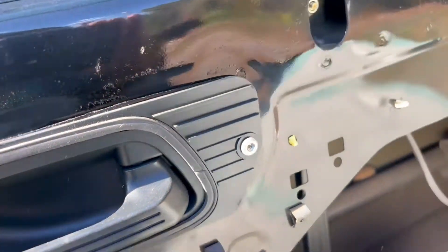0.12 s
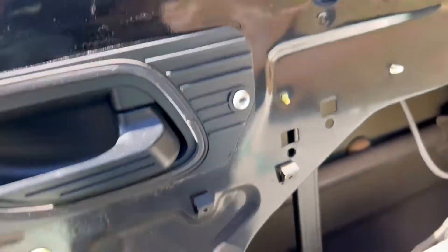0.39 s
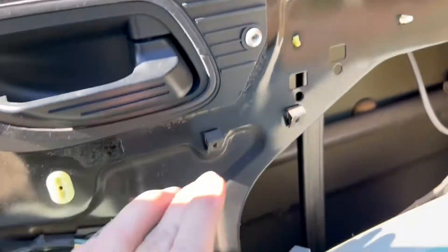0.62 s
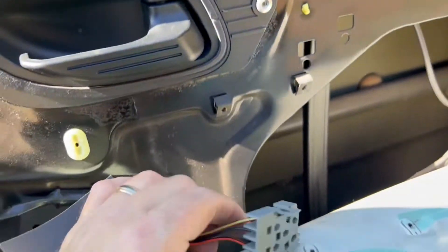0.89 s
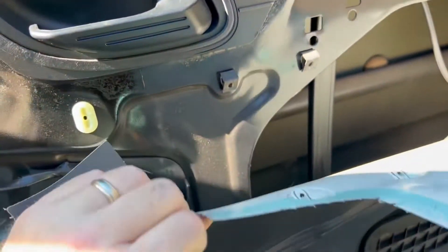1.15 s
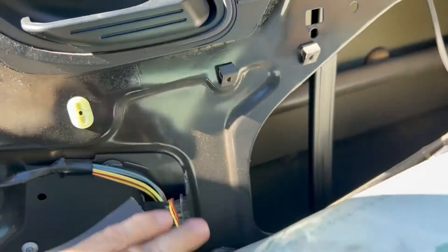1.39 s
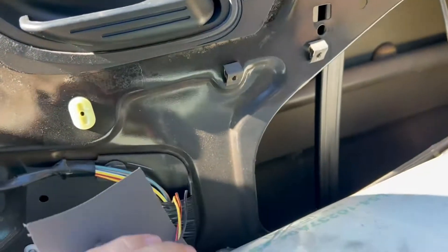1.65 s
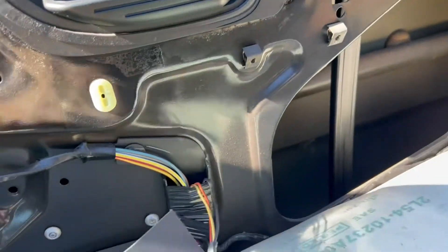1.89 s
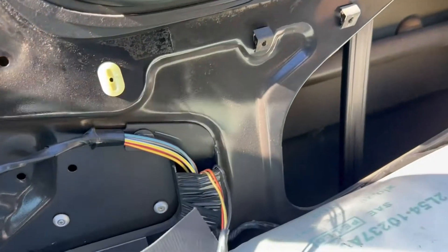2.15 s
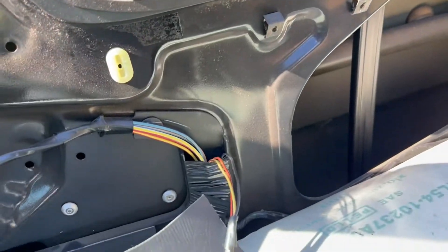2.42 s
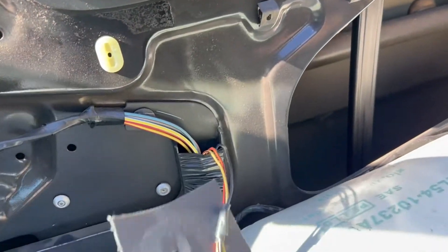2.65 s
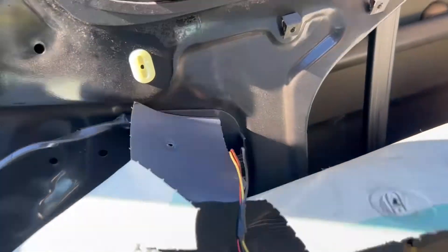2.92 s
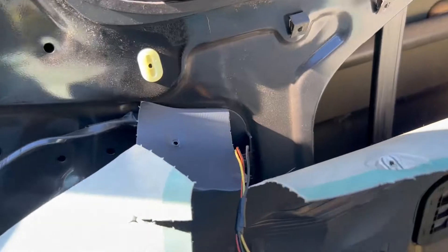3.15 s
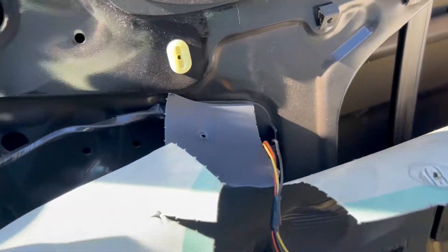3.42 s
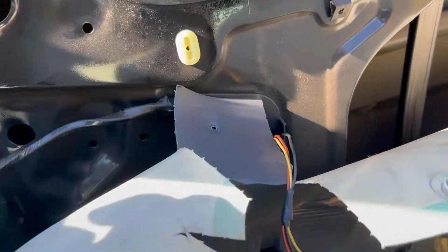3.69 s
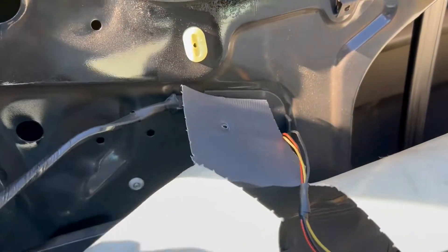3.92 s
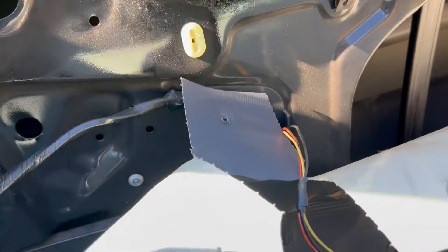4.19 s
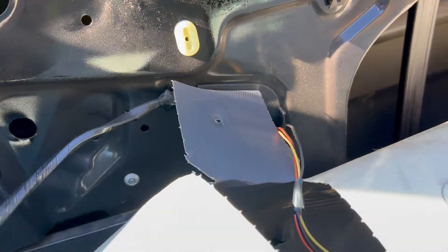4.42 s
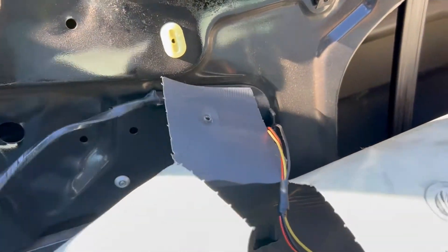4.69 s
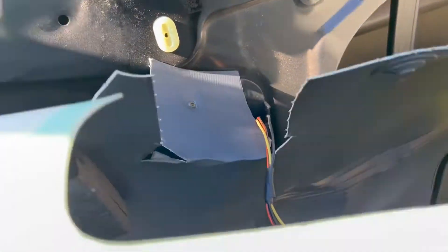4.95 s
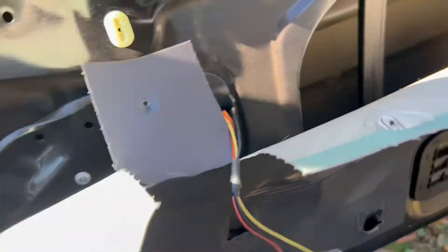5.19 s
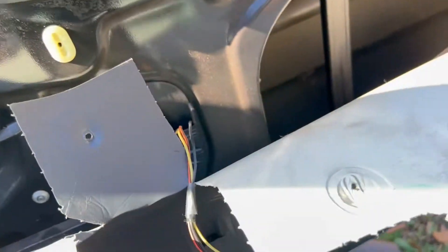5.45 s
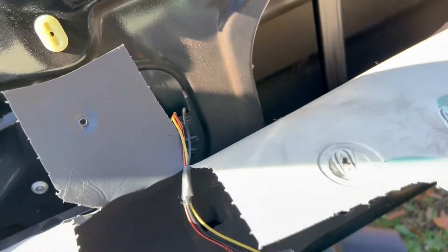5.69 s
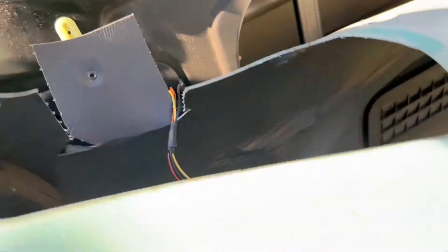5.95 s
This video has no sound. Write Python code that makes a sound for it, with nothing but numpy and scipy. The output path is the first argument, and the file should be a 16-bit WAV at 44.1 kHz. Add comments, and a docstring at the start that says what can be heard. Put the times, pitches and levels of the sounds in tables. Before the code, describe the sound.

A stiff plastic sheet rustles and crinkles against a metal car door panel, with sharp snaps and hollow knocks over a low rumble.

```python
"""At the inner panel of a car door, a stiff plastic sheet is bent, slid and pressed against the metal.
Sliding strokes rustle (banded micro-slips) and crinkle (random slips ringing the sheet's modes); the edge scrapes
(gliding noise bands), creases snap (slip bursts into the modes), bulges pop (short sagging sines).
Knocks make the panel boom (decaying modes). Beneath lie a low rumble (banded noise), a faint motor hum (wavering
sine) and hiss. Two closely spaced microphones, near the hands."""
import sys
import numpy as np
from scipy import signal
from scipy.io import wavfile

SR = 44100
rng = np.random.default_rng(int(sys.argv[2]) if len(sys.argv) > 2 else 0)


def boost(x):
    """Linear amplitude factor 10**(x/20) for a level x in decibels (scalar or array-like)."""
    u = np.asarray(x, float) / 20
    return 10 ** u


def digitize_waveform(pressure):
    """Quantize a signal to 16-bit integers and store it at the path in sys.argv[1].

    Rows of a 2-D input are taken as channels; values are limited to [-1, 1].
    """
    field = np.atleast_2d(pressure).T
    bounded = np.clip(field, -1, 1)
    quanta = np.round(bounded * 32767).astype(np.int16)
    wavfile.write(sys.argv[1], SR, quanta)


N = 268260


def rms_one(x):
    """Scale to unit rms."""
    return x / np.sqrt(np.mean(x ** 2) + 1e-20)


def in_time(rows):
    """Columns of a breakpoint table, one value per sample."""
    s, *columns = np.transpose(rows)
    return [np.interp(np.arange(N) / SR, s, c) for c in columns]


def at_hz(points, hz):
    """Read a spectrum on a log-frequency axis."""
    point_hz, values = np.transpose(points)
    return np.interp(np.log(hz), np.log(point_hz), values)


def drift(rate_hz):
    """Slow random wander of spread 1: noise through a double pole, run at SR / 40."""
    r = np.exp(-2 * np.pi * rate_hz * 40 / SR)
    noise = rng.standard_normal(N // 40 + 2002)
    slow = rms_one(signal.lfilter([1], [1, -2 * r, r * r], noise)[2000:])   # start-up dropped
    return np.interp(np.arange(N) / 40, np.arange(len(slow)), slow)


def lowpass(x, hz):
    """Second-order low-pass."""
    return signal.sosfilt(signal.butter(2, hz, fs=SR, output="sos"), x)


def ring(drive, hz, t60_s):
    """Two-pole resonator: a unit click sets a sine of height 1 ringing."""
    r, w = boost(-60 / (t60_s * SR)), 2 * np.pi * hz / SR
    return signal.lfilter([0, np.sin(w)], [1, -2 * r * np.cos(w), r * r], drive + 1e-18)


def grains(shape, per_s, spread_db):
    """Random micro-slips of uneven size and sign; rms 1."""
    sizes = boost(spread_db * np.minimum(rng.exponential(1, shape), 5))
    signs = rng.choice([-1, 1], shape)
    return rms_one(sizes * signs * (rng.random(shape) < per_s / SR))


# left-right likeness: (frequency [Hz], correlation)
LIKENESS = [(60, 0.98), (240, 0.95), (950, 0.053), (3770, 0.25), (15000, 0.45)]


def banded(source, spectrum, edges_hz, treble_db, patchy_db):
    """Stereo bands, each with its own level, flicker and likeness; the treble moves on its own."""
    out, together = 0, drift(25.0)
    for k, (low, high) in enumerate(zip(edges_hz, edges_hz[1:])):
        band = signal.butter(2, [low, high], "band", fs=SR, output="sos")
        mid, side = signal.sosfilt(band, source[k % 2])
        hz = np.sqrt(low * high)
        alike = np.clip(at_hz(LIKENESS, hz), -1, 1)
        treble_share = np.clip(np.log2(hz / 1600) / 0.5, 0, 1)
        flicker_db = patchy_db * (0.5 * together + drift(11.0))
        gain = boost(at_hz(spectrum, hz) + treble_share * treble_db + flicker_db)
        out = out + gain * (np.sqrt(1 + alike) * mid + np.sqrt(1 - alike) * side * [[1], [-1]])
    return out


def hiss():
    """Steady white noise, independent in the two channels."""
    return boost(-79.5) * rng.standard_normal((2, N))


HUM_ON_S, HUM_OFF_S, HUM_RISE_S = 0.55, 2.45, 0.87
HUM_HZ, HUM_DB, HUM_FADE_DB_PER_S = 91.8, -50, 1
WAVER_DB, WAVER_HZ = 2.5, 4.0   # spread of level and pitch


def hum():
    """A faint motor tone: a sine that wavers in pitch and level and slowly fades."""
    end_db = HUM_DB - HUM_FADE_DB_PER_S * (HUM_OFF_S - HUM_ON_S)
    level_db, = in_time([(HUM_ON_S - HUM_RISE_S, -70), (HUM_ON_S, HUM_DB),
                         (HUM_OFF_S, end_db), (HUM_OFF_S + 0.21, -90)])
    gain = np.sqrt(2) * boost(level_db + WAVER_DB * drift(5.0))
    hz = HUM_HZ + WAVER_HZ * drift(14.0)
    return gain * np.sin(2 * np.pi * np.cumsum(hz) / SR)


# strokes of the sliding sheet: (start [s], hold [s], relative rustle level [dB], treble over rustle [dB])
STROKES = [(0.0, 0.49, -50, -8), (0.087, 0.086, -42, -17.5), (0.538, 0.42, -59.5, -4),
           (0.874, 0.051, -50.5, -7), (0.968, 0.38, -53.5, -7.5), (1.142, 0.12, -46, -8),
           (1.267, 0.079, -48.5, -16), (1.396, .18, -53, -10.5), (1.652, 0.084, -51, -3),
           (1.79, 0.015, -53.5, -11), (1.889, 0.069, -55, -10.5), (2.196, 0.045, -82.5, 10),
           (2.454, 0.057, -50, -17), (2.536, 0.27, -43.5, -11.5), (2.836, 0.21, -53, -6),
           (3.082, 0.21, -52, -5), (3.362, 0.13, -51.5, -7.5), (3.523, 0.044, -51, -12.5),
           (3.64, 0.089, -40.5, -10.5), (3.757, 0.1, -50.5, -16), (3.982, 0.067, -51, -12),
           (4.09, 0.11, -49.5, -15.5), (4.205, 0.13, -55, -16), (4.453, 0.016, -51, -11.5),
           (4.529, 0.078, -53.5, -14.5), (4.65, 0.12, -51.5, -7.5), (4.804, 0.024, -44.5, -7.5),
           (4.882, 0.14, -49.5, -7.5), (5.148, 0.027, -69.5, -11), (5.309, 0.019, -75, 6.5),
           (5.647, 0.088, -52, -7.5), (5.748, 0.074, -53.5, -3.5), (5.848, 0.17, -51.5, -4),
           (6.013, 0.21, -50, 0.5)]
RISE_DB_PER_S, FALL_DB_PER_S = 451, 322.5
REST_DB, REST_TREBLE_DB = -74.5, -93.5   # sheet barely moving


def handling():
    """Strokes rise, hold and fall, overlaps adding in power; gives relative rustle and treble levels in dB."""
    t, power = np.arange(N) / SR, boost([[REST_DB], [REST_TREBLE_DB]]) ** 2
    for s, hold_s, level_db, treble_db in STROKES:
        away_db = RISE_DB_PER_S * np.maximum(s - t, 0) + FALL_DB_PER_S * np.maximum(t - s - hold_s, 0)
        power = power + boost(level_db - np.minimum(away_db, 99) + np.array([[0], [treble_db]])) ** 2
    return 10 * np.log10(power)


RUMBLE_DB, RUMBLE_FOLLOWS, SETTLE_S = -48.5, 0.43, 0.031   # usual level; share of rustle's swing; lag


def shaking(level_db):
    """The panel's shaking follows the handling level through a one-pole lag."""
    r = np.exp(-1 / (SETTLE_S * SR))
    swing_db = level_db - np.median(level_db)
    return RUMBLE_DB + RUMBLE_FOLLOWS * signal.lfilter([1 - r], [1, -r], swing_db)


# bass noise spectrum: (frequency [Hz], relative level per Hz [dB])
RUMBLE = [(25, -24.5), (43, 2), (81, 3.5), (99, -4), (118, -8.5), (162, -3), (263, -14), (400, -20)]
QUIET_TILT = 1   # extra dB above 130 Hz per dB of shaking


def rumble(level_db):
    """Door panel and hands shake in the bass; at rest the part above 130 Hz sinks further than the deep part."""
    noise, edges_hz = rng.standard_normal((2, 2, N)), 25 * 2 ** np.arange(0, 4.1, .5)
    sound = rms_one(banded(noise, RUMBLE, edges_hz, 0, patchy_db=.8))
    deep = lowpass(sound, 130)
    upper = signal.sosfilt(signal.butter(2, 130, "high", fs=SR, output="sos"), sound)
    tilt = boost(QUIET_TILT * (level_db - RUMBLE_DB))
    return boost(level_db) * (deep - upper * tilt)   # minus: the two halves are in antiphase at 130 Hz


# knocks on the door panel: (time [s], relative level [dB], boom [Hz], t60 [s])
KNOCKS = [(0.062, -34, 80, 0.17), (0.188, -29.5, 102, 0.33), (0.364, -14, 211, 0.22),
          (0.383, -12, 84.4, 0.23), (0.878, -32.5, 93, 0.29), (1.177, -8.5, 152.4, 0.28),
          (1.199, -11.5, 94.4, 0.3), (1.714, -32, 57.6, 0.28), (2.655, -20.5, 93, 0.21),
          (2.78, -11, 145, 0.15), (2.827, -21, 154.2, 0.64), (3.492, -24, 62, 0.15),
          (3.7053, -13, 187.4, 0.25), (3.818, -22.5, 123, 0.31), (3.886, -24, 130, 0.09),
          (4.032, -21.5, 150, 0.16), (4.433, -20, 170, 0.89), (4.442, -13, 72, 0.21),
          (4.831, -24.5, 205, 0.19), (5.174, -24, 67.7, 0.47), (4.772, -17.5, 74.6, 0.32),
          (4.901, -23.5, 189, 0.13), (4.938, -19, 180.6, 0.17), (4.978, -21, 215.3, 0.2),
          (5.14, -20, 64.9, 0.44), (5.669, -27, 88, 0.23)]
# panel modes: (multiple of the boom, level [dB], share of t60)
PANEL = [(1.0, 3.5, 0.55), (.52, -18, 1.9), (.74, -5, 1.1), (1.27, -5.5, 0.91), (1.599, -6.5, 0.58),
         (2.3, -13.5, 0.48), (3.1, -12.5, 0.19)]
PUSH_CYCLES = 0.32   # rise time constant, cycles of the boom
KNOCK_SIDE_DB = -16.5   # unequal reach of each mode to the two microphones
RATTLE_DB = 2   # loose parts make the ringing uneven


def knocks():
    """A soft push sets the panel's boom and its neighbouring modes ringing."""
    out, age = np.zeros((2, N + SR)), np.arange(SR // 2) / SR
    for (s, level_db, hz, t60_s), luck in zip(KNOCKS, rng.standard_normal((len(KNOCKS), len(PANEL), 2))):
        boom = 0
        for (multiple, mode_db, share), (v, lean) in zip(PANEL, luck):
            decay = boost(mode_db + 0.5 * v - 60 * age / (share * t60_s))
            tone = np.sin(2 * np.pi * multiple * (1 + .04 * v) * hz * age)
            boom = boom + decay * tone * (1 + boost(KNOCK_SIDE_DB) * lean * np.array([[1], [-1]]))
        at = round(s * SR)
        push = 1 - np.exp(-age * hz / PUSH_CYCLES)
        out[:, at:at + len(age)] += boost(level_db - 11.0) * push * boom
    return out[:, :N] * boost(RATTLE_DB * drift(48.0))


# sheet edge dragging over metal: (start [s], length [s], from [Hz], to [Hz], level [dB])
SCRAPES = [(0.135, 0.051, 2800, 2620, -62), (1.404, 0.052, 3100, 3480, -62),
           (2.52, 0.05, 3600, 3380, -57.5), (2.588, 0.1, 2000, 2897, -57), (5.845, 0.053, 2900, 2800, -54),
           (5.896, 0.093, 1012, 1100, -49)]


def scrape():
    """Each drag is a narrow rough band: low-passed noise on a gliding carrier."""
    out = 0
    for s, length_s, from_hz, to_hz, db in SCRAPES:
        end_s = s + length_s
        hz, = in_time([(s, from_hz), (end_s, to_hz)])
        level_db, = in_time([(s - .02, -120), (s, db + 1), (s + 0.9 * length_s, db),
                             (end_s, db - 17), (end_s + 0.023, -120)])
        rough = rms_one(signal.lfilter([1], [1, -.982], rng.standard_normal((2, N))))
        phase = 2 * np.pi * np.cumsum(hz) / SR
        out = out + boost(level_db) * (rough[0] * np.sin(phase) + rough[1] * np.cos(phase))
    return out


# rustle spectrum: (frequency [Hz], relative level per Hz [dB])
RUSTLE = [(300, -13.5), (701, -7), (994, -1), (1750, -10), (2400, -12), (8360, -22), (9880, -18),
          (12500, -22.5), (16000, -24.5)]


def rustle(level_db, treble_db):
    """Dense micro-slips of the sheet over metal; narrow patches of colour come and go as it bends."""
    slips = grains((2, 2, N), per_s=1600, spread_db=3.0)
    edges_hz = 300 * 2 ** np.arange(0, 5.8, .25)
    return boost(level_db + 10.5) * banded(slips, RUSTLE, edges_hz, treble_db - level_db + 10.0, patchy_db=3.0)


# sheet modes, also rung by snaps(): (frequency [Hz], relative level [dB], t60 [s])
SHEET = [(379, 0.5, 0.016), (548, 9, 0.013), (708, -6.5, 0.022), (1100, -4.5, 0.019), (1407, 1.5, 0.0051),
         (1850, -10.5, 0.0045), (2320, -6.5, 0.0048), (3100, -16, 0.004), (4400, 2, 0.00068),
         (5120, 8.5, 0.002), (7400, 3.5, 0.0044), (9600, 16.5, 0.00045), (11670, -12.5, .0015),
         (14000, -5, 0.0006)]


def crinkles(level_db, treble_db):
    """Small creases give way at random while the sheet moves; each softly rings a few of its modes."""
    slips, out = grains((2, N), per_s=330, spread_db=3.5), np.zeros((2, N))
    for hz, mode_db, t60_s in SHEET:
        moving_db = level_db if hz < 2500 else treble_db - 25.5
        touched = boost(4.0 * drift(51.0))   # creases lie at changing places
        drive = (slips[0] + slips[1] * [[1], [-1]]) * touched * boost(moving_db + mode_db)
        twice = ring(ring(drive, hz, t60_s), hz, t60_s)   # soft onset, narrow colour
        out += twice / (t60_s * SR) ** (3 / 2)
    return boost(18.5) * out


LAG_MS = 0.049   # right microphone after left
ASIDE_FROM_S, ASIDE_TO_S, ASIDE_LAG_MS = 4.42, 4.44, .24   # the hardest slap lands off to one side


def lag_ms(s):
    """How much later the right microphone hears a contact at time s."""
    return ASIDE_LAG_MS if ASIDE_FROM_S < s < ASIDE_TO_S else LAG_MS


# bulges flipping, one mode alone: (time [s], frequency [Hz], peak level [dB], t60 [ms])
POPS = [(0.057, 580, -32, 9.1), (0.071, 500, -40, 15), (0.146, 770, -36, 23), (0.187, 515, -44, 13),
        (0.235, 1610, -35.5, 16), (0.404, 1080, -32.5, 19), (0.406, 2050, -42, 27), (0.476, 890, -38.5, 18),
        (0.611, 790, -49.5, 13), (1.174, 485, -12.5, 14), (1.173, 1894, -26, 14), (1.214, 1100, -37, 31),
        (1.251, 940, -40, 21), (2.588, 990, -29, 8.5), (2.607, 2090, -42, 27), (2.716, 1020, -32.5, 12),
        (2.736, 1340, -37, 15), (2.776, 1100, -15.5, 12), (2.78, 620, -29, 11), (2.863, 1026, -19.5, 17),
        (3.01, 2560, -42, 20), (3.224, 1100, -40, 14), (3.488, 1040, -40, 12), (3.623, 1150, -42, 15),
        (3.698, 980, -24, 12), (3.838, 1140, -27.5, 13), (3.988, 1403, -28, 28), (3.991, 2440, -35, 29),
        (4.43, 1500, -5, 11), (4.433, 2550, -17, 12), (4.431, 3150, -20, 10.7), (1.7173, 3560, -28, 7),
        (1.692, 930, -41, 12), (1.178, 260, -18.5, 22), (3.704, 221, -16.5, 25), (4.024, 1320, -36, 18),
        (4.969, 1616, -39.5, 31), (4.532, 1170, -32.5, 11), (4.822, 1920, -38.5, 22),
        (5.004, 1040, -46, 34), (5.669, 597, -41, 20.3), (5.746, 510, -41.5, 19), (6.036, 1180, -43.5, 22)]
SAG_HZ = 45   # starts this far sharp, ends this far flat


def pops():
    """A flipping bulge rings one sine that swells, dies and sags in pitch as it relaxes."""
    out, age = np.zeros((2, N + SR)), np.arange(SR // 10) / SR
    for (s, hz, peak_db, t60_ms), turn in zip(POPS, rng.random(len(POPS))):
        decay = age * np.log(1000) * 1000 / t60_ms   # age in decay time constants
        pitch_hz = hz + SAG_HZ * (2 * np.exp(-decay) - 1)
        swell = np.e * decay * np.exp(-decay)
        tone = boost(peak_db) * swell * np.sin(2 * np.pi * (np.cumsum(pitch_hz) / SR + turn))
        for side, at in enumerate([round(s * SR), round((s + lag_ms(s) / 1000) * SR)]):
            out[side, at:at + len(age)] += tone
    return out[:, :N]


# crease snaps and stick-slip bursts:
# (time [s], length [ms], level [dB], hollow body over level [dB], bright edge over level [dB])
SNAPS = [(0.057, 2.1, -42.5, 4, -10.5), (0.166, 1.5, -39, -11, -4), (0.185, 3.9, -41.5, 5, -8),
         (0.2333, 18.6, -46.5, 1.5, -8), (0.27, 11, -51.5, 2.5, 0), (0.353, 13, -47.5, -2, -3),
         (0.3803, 27, -44, 2.5, -14), (0.4717, 5.2, -50, -6, 16.5), (0.484, 11, -62, -2, 14.5),
         (0.5403, 2.5, -55, -3, 14), (0.668, 4.1, -52.5, -12, -2), (0.746, 6.5, -56, -5, -19),
         (0.7778, 5.5, -53.5, -6, -2.5), (0.891, 10, -43.5, -3, -10), (1.1748, 9.2, -35.5, 9, -9.5),
         (1.186, 11.5, -41.5, -2, -6), (1.215, 13.6, -43, 0, -5), (1.242, 3, -58, -5, -1),
         (1.2872, 5.5, -51, 6, 15), (1.303, 4.9, -51, -4, 11.5), (1.3185, 7.8, -49.5, -3, 14),
         (1.430, 6, -47.5, -2, -6), (1.693, 3.9, -55, -5, 6), (1.704, 3, -52.5, 2, 8),
         (1.7176, 4.7, -37.5, -6, 8), (0.282, 10, -58, -9, 2), (2.428, 8.9, -57, 0, -20),
         (1.7924, 2.5, -49.5, -3, 13), (1.803, 1.4, -60.5, 2, 18), (1.9426, 1.3, -49.5, -5, 5),
         (2.496, 14, -51.5, 6.5, 2.5), (2.622, 24, -47.5, -3, -1), (2.654, 7.3, -53.5, 5.5, 9),
         (2.684, 1.5, -54, 11, 0.5), (2.757, 13.4, -34, -1, -10), (2.7769, 1.6, -22.5, -1.5, -5.5),
         (2.8217, 6.6, -43, 4.5, -6), (2.837, 4.4, -37, -13, -28), (2.856, 43, -39.5, -15, 2),
         (2.865, 2.1, -31.5, 4, 3), (2.9045, 4, -40, -5.5, 13.5), (2.9912, 7.5, -52, -2, 18),
         (3.012, 5.6, -45, 1, 1.5), (3.044, 25, -51, -19, 5), (3.124, 34, -51, -10, 3.5),
         (3.1726, 14, -48, -4, 7), (3.197, 23, -49, -7, -0.5), (3.3789, 9, -45.5, -31, 4.5),
         (3.396, 4, -44.5, -15, -4), (3.4623, 6.1, -42, -3.5, -2.5), (3.5168, 5.5, -39.5, -28, 5),
         (3.5619, 7.7, -41, -28, -2), (3.6141, 3.3, -46, -25, 11.5), (3.645, 2.9, -43.5, 2, 18.5),
         (3.666, 46, -37, -1.5, 8.5), (3.686, 2, -34.5, -10, 7.5), (3.6993, 5.5, -24.5, -6, -6),
         (3.776, 7.8, -47, -7, -18), (3.819, 2.7, -32, -13, -13), (3.8389, 1.8, -33, -48, -1),
         (3.885, 2.4, -47.5, -7, -6.5), (3.9891, 11, -29.5, -44, -8.5), (4.0256, 7.6, -42, -33, -10),
         (4.1116, 8.4, -44, -2, -40), (4.174, 9.1, -47.5, -16, -8.5), (4.205, 1.45, -36, -4, -6.5),
         (4.2283, 1.7, -31, -39, -6), (4.264, 26.5, -37.5, -46, -8), (4.315, 3.2, -41, -4.5, 0.5),
         (4.4292, 4.6, -14.5, -8, -5.5), (4.475, 14, -58.5, 18, 2.5), (4.531, 2.8, -54, 8, -5),
         (4.594, 17, -52, -4, 2.5), (4.7469, 6.4, -47.5, -24, -6), (4.814, 15, -43.5, -9.5, -3),
         (4.9647, 10, -40.5, 1, -8.5), (5.745, 4.1, -52, 3, -4), (5.6685, 1.9, -44, -3.5, -15),
         (5.7698, 10.3, -49.5, 0.5, -6), (6.073, 21, -53.5, -19, 18.5)]
FIRST_SLIP = 4.5   # opening slip, relative size
BEND = .06   # largest share by which bending shifts a mode
SWELL_DB_PER_MS, TURN_MS = .3, 20   # longer bursts build up, shorter ones fall
BODY_LATE_MS = 1.5   # low bending waves travel slowly
HARD_DB, DULL_OCTAVES_PER_DB = -24, .15   # harder snaps flex more sheet and lose their top
LEFT_DB, LEFT_SPREAD_DB = 2.8, 4   # left over right, each snap from its own place
LAG_SPREAD_MS = 0.038


def slip_burst(age, ms):
    """Stick-slip drive: slips a few ms apart over finer crackle, cut off after the burst's length."""
    length_s = max(ms, 1.0) / 1000
    gaps_s = .0033 * rng.uniform(0.51, 1.5, 40)
    slips = 0.52 * grains(len(age), per_s=6700, spread_db=2.0)
    at = np.minimum((np.cumsum(gaps_s) - gaps_s[0]) * SR, len(age) - 1).astype(int)
    slips[at] += 2.7 * boost(rng.normal(0, 0.83, 40))
    slips[0] = FIRST_SLIP   # the crease lets go with a tick
    held = boost(-2200 * np.maximum(age - 0.99 * length_s, 0))
    tail = boost(-19.0 - 650 * age)
    swell_db = np.clip(SWELL_DB_PER_MS * (ms - TURN_MS), -12.0, 8.0)
    return slips * (held + tail) * boost(swell_db * np.minimum(age / length_s - 1, 0))


def snaps():
    """Slip bursts ring the bent sheet, its modes shifted per burst; body, middle and edge radiate apart."""
    age, out = np.arange(SR // 10) / SR, np.zeros((2, N + SR))
    group = np.digitize(np.array(SHEET)[:, 0], [900, 2500])   # body, middle, edge
    edges_hz = [([250, 1100], "band"), ([750, 2800], "band"), (2200, "high")]
    bands = [signal.butter(2, hz, kind, fs=SR, output="sos") for hz, kind in edges_hz]
    chance = rng.standard_normal((len(SNAPS), len(SHEET), 2))
    for (s, ms, level_db, body_db, edge_db), luck in zip(SNAPS, chance):
        drive = slip_burst(age, ms)
        parts = np.zeros((3, len(age)))
        for (hz, mode_db, t60_s), (bend, strength), part in zip(SHEET, luck, group):
            bent_hz = hz * (1 + BEND * np.tanh(bend))
            parts[part] += boost(mode_db + 1.4 * strength) / np.sqrt(t60_s) * ring(drive, bent_hz, t60_s)
        parts = np.array([signal.sosfilt(band, part) for band, part in zip(bands, parts)])
        late = round(BODY_LATE_MS * SR / 1000)
        parts[0] = np.pad(parts[0], (late, 0))[:len(age)]
        top_hz = SR / 2 * 2 ** (-DULL_OCTAVES_PER_DB * max(level_db - HARD_DB, 0))
        parts[2] = lowpass(parts[2], np.clip(top_hz, 3000, 20000))
        sounding = parts[:, :int((max(ms, 1.0) / 1000 + .002) * SR)]
        part_rms = np.sqrt(np.mean(sounding ** 2, axis=1))
        levels_db = level_db + np.array([body_db, 0, edge_db])
        burst = (boost(levels_db) / part_rms) @ parts
        pan_db = LEFT_DB + LEFT_SPREAD_DB * rng.standard_normal()
        lag = round((lag_ms(s) + LAG_SPREAD_MS * rng.standard_normal()) * SR / 1000)
        for side, at in enumerate([round(s * SR), round(s * SR) + lag]):
            out[side, at:at + len(age)] += boost(pan_db * (.5 - side)) * burst
    return out[:, :N]


def scene():
    """All sources at the two microphones."""
    moving = handling()
    background = hiss() + hum() + rumble(shaking(moving[0]))
    sheet = scrape() + rustle(*moving) + crinkles(*moving) + pops() + snaps()
    return background + knocks() + sheet


def roll_off(x):
    """The treble ends steeply here."""
    return signal.sosfilt(signal.butter(12, 16830, fs=SR, output="sos"), x)


def record(dry):
    """Input stage rounds peaks; spaced microphones cancel near 10 kHz in sum, 13 kHz in difference; roll-offs."""
    ceiling = 1.1
    x = ceiling * np.tanh(dry / ceiling)
    sum_notch = signal.cheby2(3, 20, [9300, 10800], "bandstop", fs=SR, output="sos")
    difference_notch = signal.cheby2(3, 20, [12600, 14300], "bandstop", fs=SR, output="sos")
    mid = signal.sosfilt(sum_notch, x[0] + x[1])
    side = signal.sosfilt(difference_notch, x[0] - x[1])
    side = side - .45 * signal.lfilter(*signal.iirpeak(7100, 3.5, fs=SR), side)   # shallower dip
    low_cut = signal.butter(4, 38, "high", fs=SR, output="sos")
    high_cut = signal.cheby2(8, 40, 16700, fs=SR, output="sos")
    stereo = np.array([mid + side, mid - side]) / 2
    mix = signal.sosfilt(np.vstack([low_cut, high_cut]), stereo)
    return roll_off(mix)


dry = scene()
out = record(dry)
digitize_waveform(out)
```